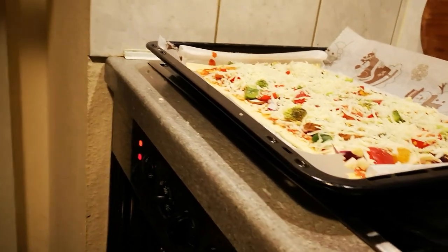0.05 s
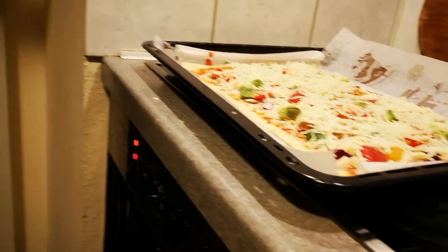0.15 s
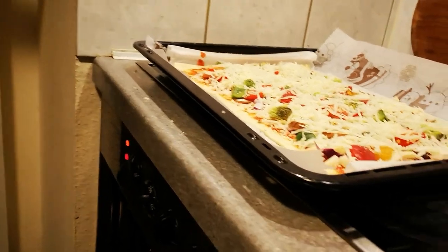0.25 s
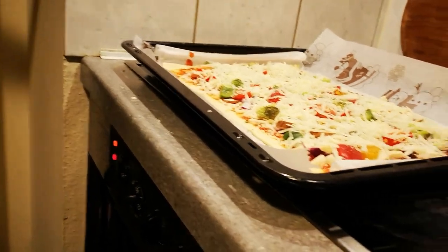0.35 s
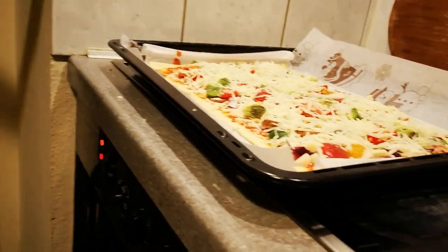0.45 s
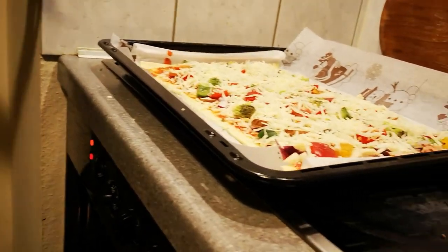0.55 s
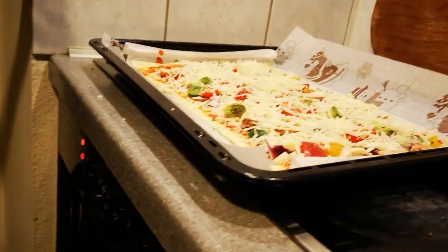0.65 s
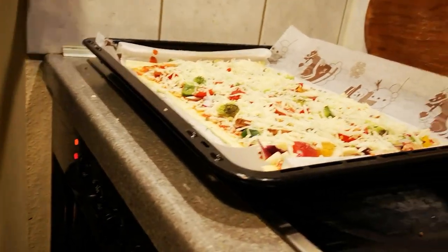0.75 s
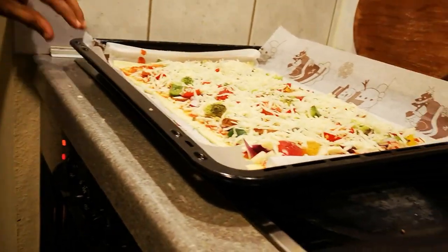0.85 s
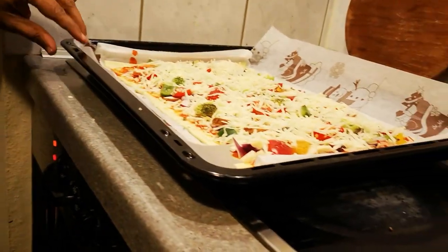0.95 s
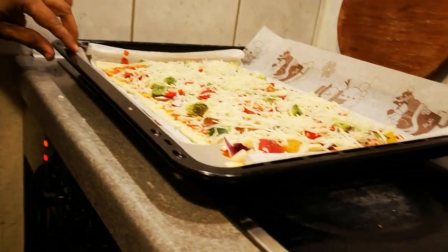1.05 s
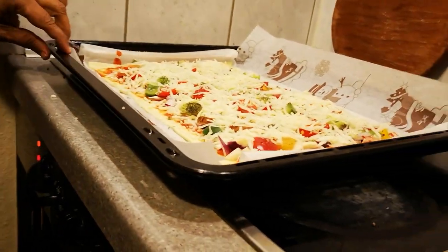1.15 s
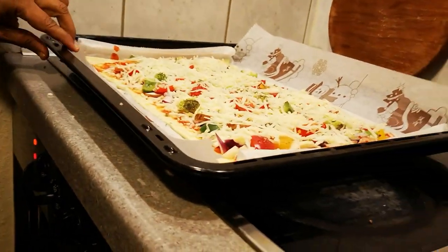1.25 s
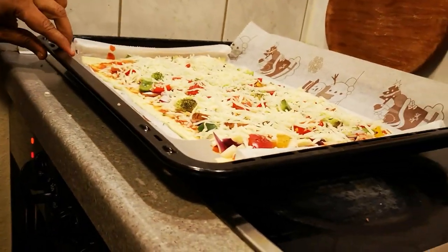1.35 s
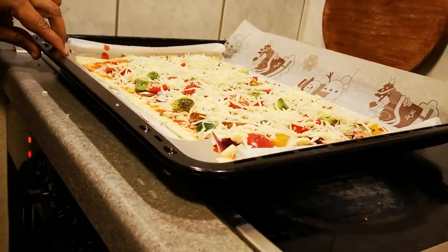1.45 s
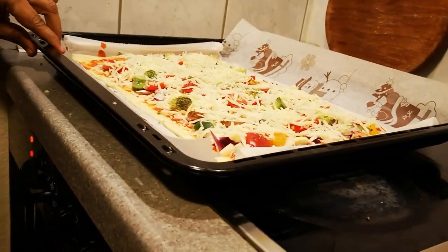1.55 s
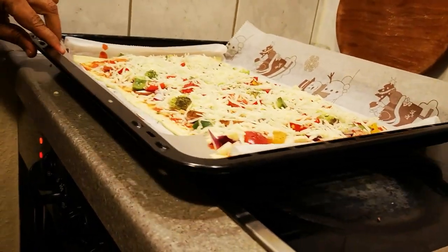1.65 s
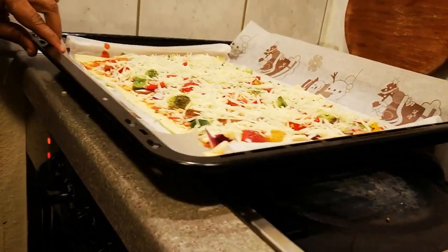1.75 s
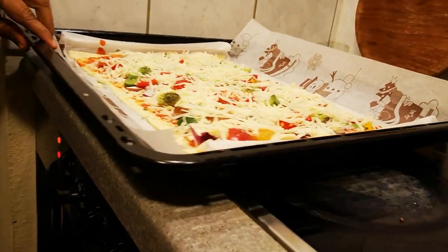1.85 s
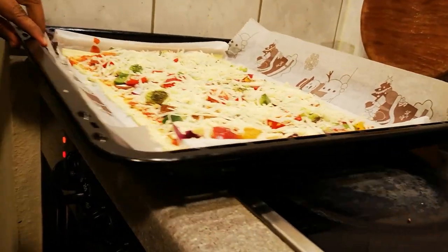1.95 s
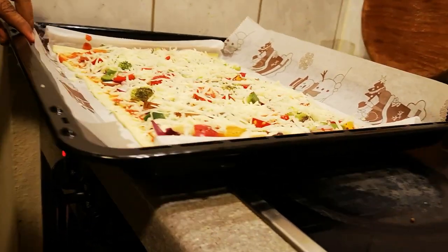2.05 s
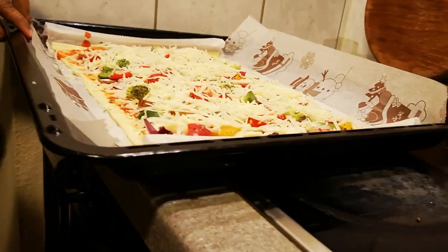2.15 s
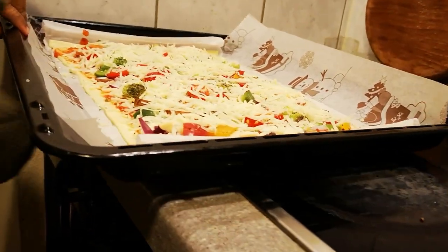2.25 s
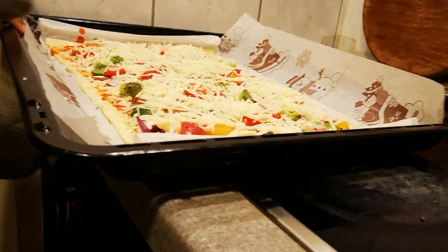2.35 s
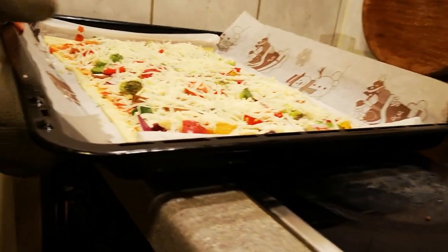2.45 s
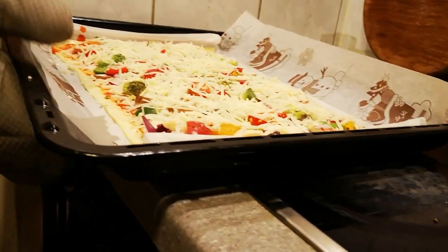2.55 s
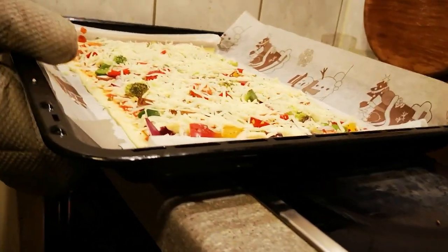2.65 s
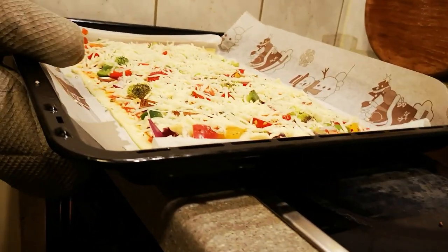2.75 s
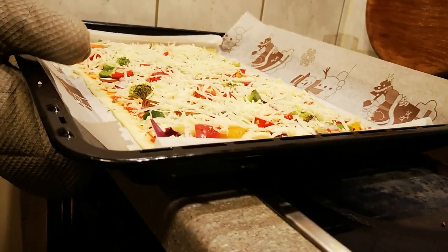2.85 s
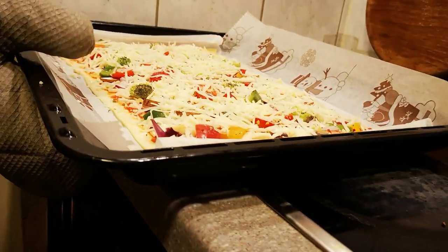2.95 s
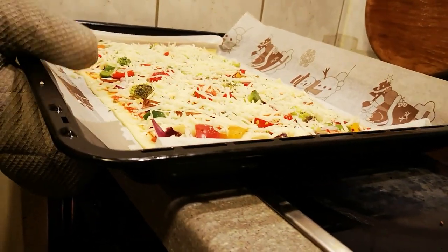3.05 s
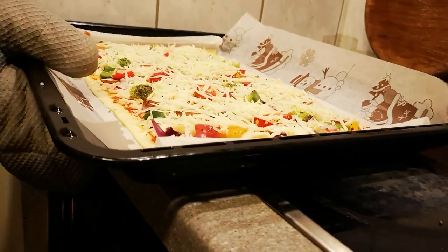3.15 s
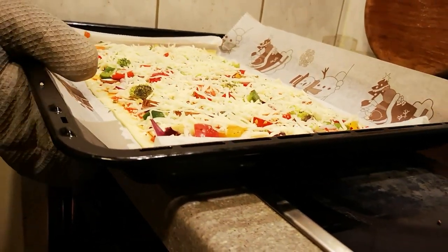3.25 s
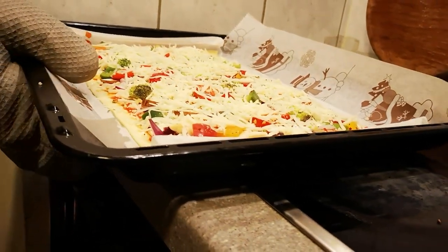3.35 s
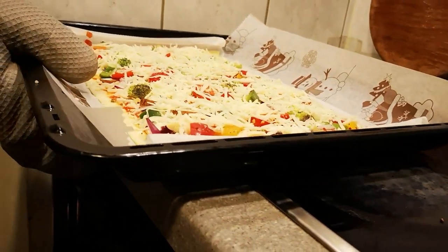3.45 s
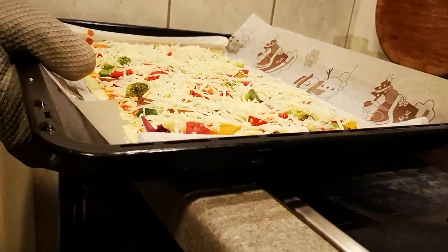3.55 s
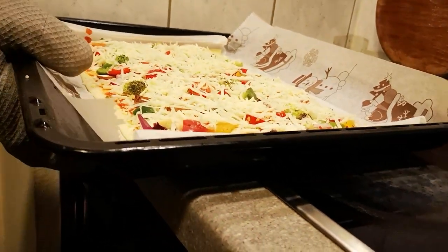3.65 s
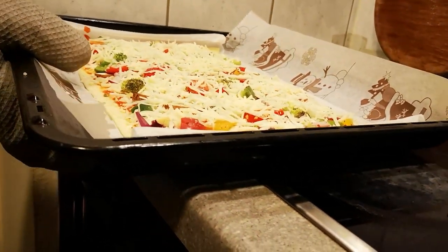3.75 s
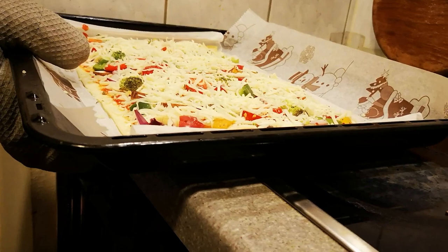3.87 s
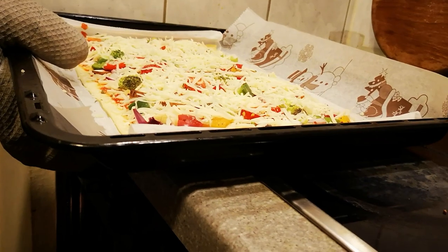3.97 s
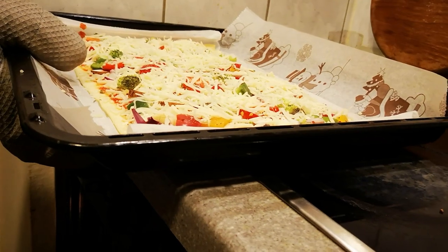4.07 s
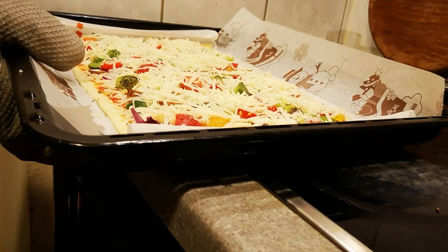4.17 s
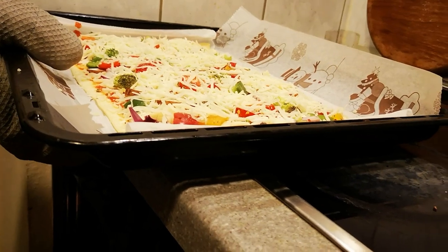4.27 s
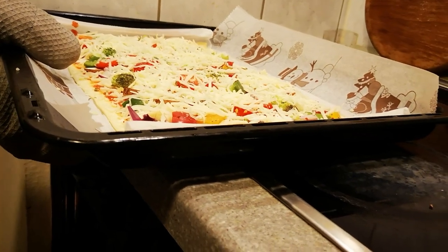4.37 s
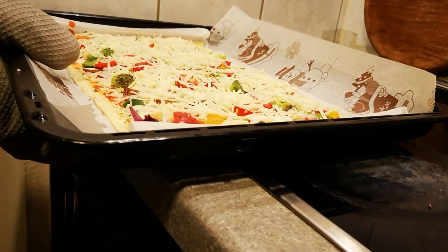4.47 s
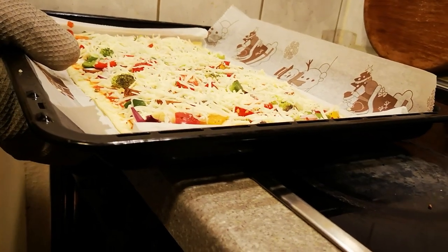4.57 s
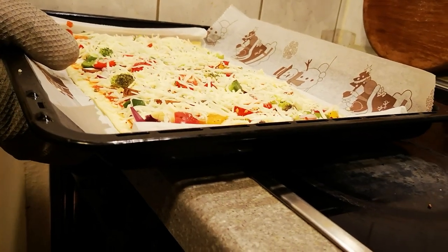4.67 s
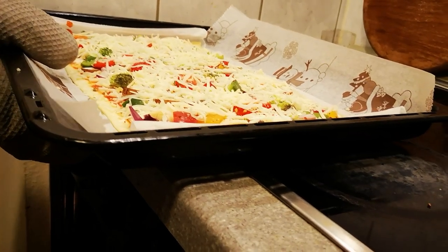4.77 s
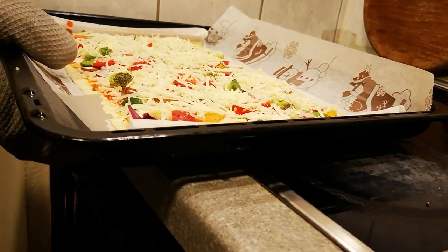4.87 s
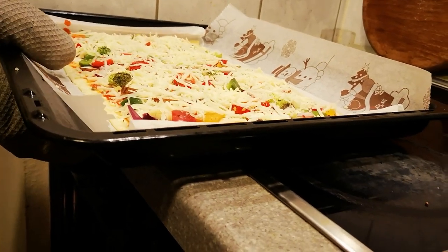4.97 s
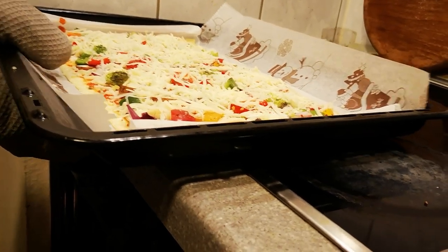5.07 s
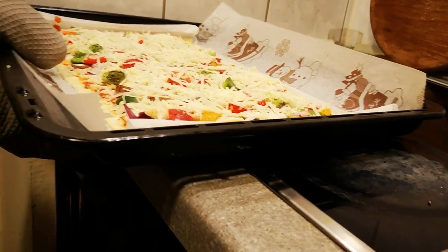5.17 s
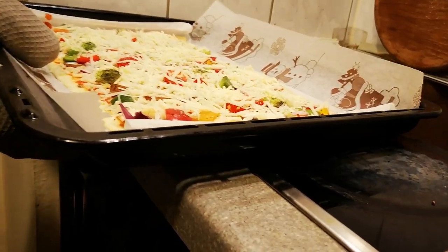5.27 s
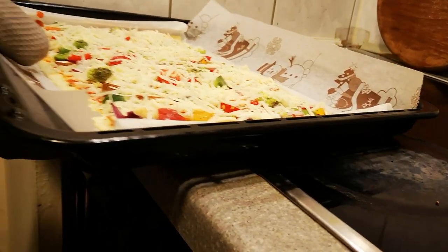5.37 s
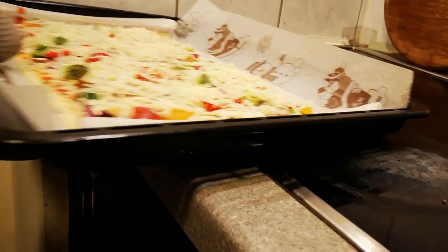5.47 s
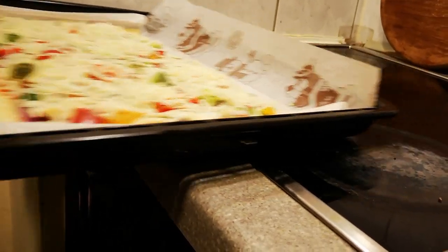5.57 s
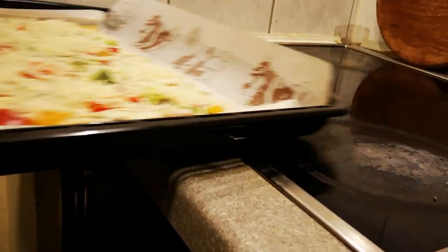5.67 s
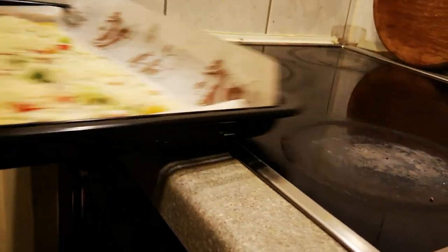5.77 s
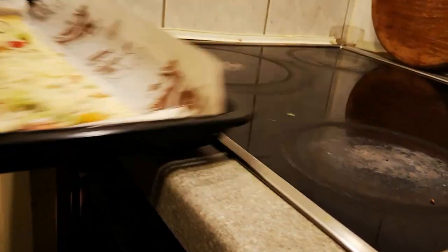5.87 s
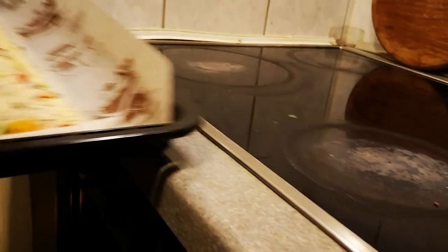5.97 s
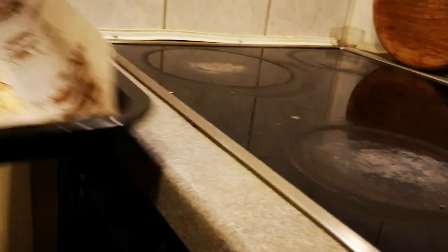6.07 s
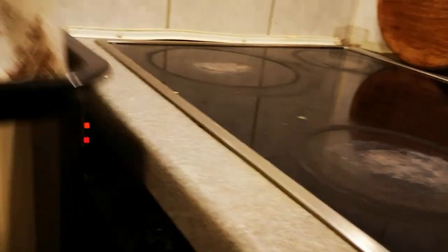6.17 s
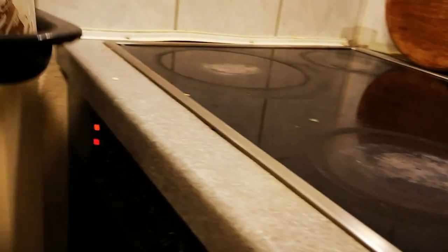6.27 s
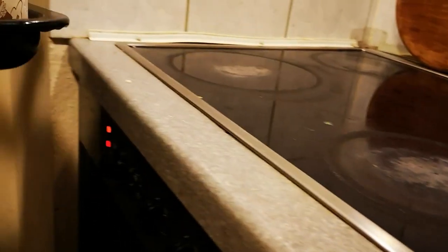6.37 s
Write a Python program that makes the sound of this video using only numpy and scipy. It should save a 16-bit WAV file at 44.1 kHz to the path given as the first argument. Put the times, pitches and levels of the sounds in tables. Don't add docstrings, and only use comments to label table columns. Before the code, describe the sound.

A quiet small kitchen with low room rumble, faint fan hum and soft airy hiss, heard closely in stereo. In the first 0.5 s a soft sleeve swipe and cloth rustle, then near quiet with a tiny fingertip tick at 1.1. At 1.37 a thin, bright metallic nudge with papery crackle; a low boom at 1.5. At 1.75 a dull tray knock rings deeply, followed by hollow steel scraping and flexing booms until about 2.2, with another knock at 2.0. Short dull thumps and scrapes come at 2.8 and 3.2, then glove rustle and light ticks around 3.5-3.7. It is nearly still from 4 to 5. Light contacts and a small rim squeak at 5.2-5.4, rattling knocks from 5.65, a rising scrape, then the loudest sharp clank at 5.9, rustling, a smaller clank at 6.07 and a quick fade to quiet.

```python
import sys
import numpy as np
from scipy import signal
from scipy.fft import rfft, irfft, next_fast_len
from scipy.io import wavfile
from scipy.ndimage import uniform_filter1d, map_coordinates

SR = 44100
rng = np.random.default_rng(int(sys.argv[2]) if len(sys.argv) > 2 else 0)


def makeup_ratio(level_db):
    decades = np.asarray(level_db, float) / 20
    return 10 ** decades


def generate_wav(sig):
    pcm = np.round(np.clip(np.atleast_2d(sig).T, -1, 1) * 32767).astype(np.int16)
    wavfile.write(sys.argv[1], SR, pcm)


N = 283122
TIME = np.arange(N) / SR

# pitch in Hz, level in dB per Hz.
ROOM_COLOUR = [(12, -43.5), (30, -7.5), (54, 1.5), (70, -8.5), (103, -5), (172, -22), (203, -19),
               (365, -28.5), (600, -30.5), (780, -59), (1320, -120)]
# pitch in Hz, level in dB per Hz.
AIR_COLOUR = [(350, -38.5), (600, -19.5), (707, -7), (778, -12.5), (892, -10.5), (968, -9), (1540, -6.5),
              (1810, -3.5), (1970, -4.5), (2850, -6.5), (3490, -10.5), (4980, -12.5), (6920, -15),
              (7820, -15.5), (15700, -20)]
# pitch in Hz, level in dB.
FAN_HUM = [(48.4, -68.5), (96.9, -74), (689.1, -93.5)]
# time in seconds, level in dB.
SWAYS = [
    (.3, -52),
    (1.86, -53),
    (2.84, -58.5),
    (3.28, -44.5),
    (5.28, -51),
    (5.85, -50.5),
]

# time in seconds, centre in Hz, level in dB.
GLIDES = [
    [(.07, 2710, -80), (.13, 2537, -69), (.2, 2190, -70), (.25, 1587, -64), (.31, 1720, -92)],
    [(1.109, 3720, -65), (1.13, 4120, -70.5), (1.22, 3930, -86)],
    [(5.31, 680, -80), (5.33, 705, -70), (5.38, 777, -59.5), (5.43, 801, -64), (5.5, 808, -73)],
    [(.02, 488, -101), (1.2, 489, -101), (1.5, 488, -112)],
]
GLIDE_WIDTHS = [800, 3200, 110, 20]

# start in seconds, level in dB, rise in seconds, fall in seconds, brightness in dB per octave.
RUSTLES = [(0, -69.5, .01, 0.093, -15.5), (.16, -72.5, 0.14, 0.14, -14), (0.345, -58.5, 0.036, 0.1, 3.5),
           (1.374, -44, 0.0018, 0.06, -2), (1.431, -51.5, 0.064, 0.09, -6), (1.758, -60, 0.021, 0.11, -6.5),
           (1.952, -59.5, 0.14, 0.44, -12), (2.182, -77, 0.042, 0.12, -11), (2.776, -68, 0.063, 0.067, -7),
           (2.822, -76.5, 0.017, 0.38, -3), (3.474, -63.5, 0.016, 0.21, -4.5), (3.55, -67.5, .06, .1, 1),
           (3.585, -60, 0.027, 0.08, -6), (3.67, -67.5, 0.003, 0.13, -7), (3.916, -71, 0.041, 0.083, -9.5),
           (4.92, -73, 0.2, 0.11, -8), (5.088, -70.5, 0.004, 0.13, -8), (5.227, -70, 0.0029, 0.14, -6),
           (5.354, -72.5, 0.016, 0.37, -10.5), (5.646, -61.5, 0.013, 0.41, -14),
           (5.832, -53.5, 0.36, 0.11, -8), (5.903, -51, 0.0024, 0.04, -11.5),
           (5.93, -49.5, 0.012, 0.25, -13.5), (6.07, -48.5, 0.0051, 0.057, -5),
           (6.12, -56, 0.14, 0.045, -11.5), (2.62, -78.5, 0.12, 0.15, -8)]
# pitch in Hz, level in dB per Hz.
CLOTH_COLOUR = [(2060, -31), (3500, -12), (5690, -2), (6290, -4), (7410, 2.5), (8360, -3.5), (9130, 2),
                (14000, -5.5), (15400, -14), (15800, -30)]

# start in seconds, peak in dB, centre in
# Hz, time to fall 60 dB in seconds.
PINGS = [(1.7546, -25, 1170, .03), (1.771, -28.5, 1830, 0.043), (1.786, -40, 1090, .04),
         (1.797, -38, 1010, 0.036), (1.857, -43, 1140, 0.058), (1.981, -50, 2020, .03),
         (2.7697, -66, 4400, .04), (2.82, -43, 860, 0.026), (2.82, -43, 1830, 0.054),
         (2.8535, -47, 2600, 0.028), (2.858, -56, 1040, .04), (2.866, -52, 1950, 0.032),
         (3.178, -49, 880, 0.055), (3.178, -47, 1890, .06), (3.2775, -60, 5800, .015),
         (3.2775, -54, 3300, 0.023), (3.215, -63, 3280, 0.027), (3.247, -60, 3500, 0.025),
         (3.278, -55, 4460, 0.019), (3.278, -54, 7100, 0.013), (3.3, -61, 2500, .02),
         (3.383, -64, 7600, 0.021), (4.868, -72, 5770, 0.089), (4.92, -69, 4340, 0.082),
         (5.085, -67, 7280, 0.13), (5.108, -63, 2502, 0.14), (5.228, -62, 7840, 0.17),
         (5.227, -56, 2900, .04), (5.385, -58, 6507, .02), (5.518, -59, 1800, .03),
         (5.547, -55, 2500, .03), (5.614, -55, 2160, .02), (5.64, -40, 2510, 0.034),
         (5.654, -50, 5550, .05), (5.7, -51.5, 2220, .03), (5.745, -44.5, 10000, .02),
         (5.796, -33, 2580, 0.038), (5.82, -41, 2170, .03), (5.8946, -21, 2010, .015),
         (5.895, -27.5, 330, 0.043), (5.894, -24.5, 6270, 0.036), (5.899, -10.5, 1420, 0.022),
         (5.9015, -19, 2200, .015), (5.897, -20.5, 2980, 0.0099), (6.0696, -31, 1274, 0.035),
         (6.0692, -22.5, 3320, 0.031), (6.074, -34, 2020, 0.041), (6.23, -75.5, 10430, 0.05),
         (1.1095, -61, 3220, 0.039), (1.7518, -25, 2400, 0.03), (1.752, -40, 617, 0.036),
               (1.756, -30, 1900, .02), (1.7525, -41, 4200, 0.015), (2.008, -42, 2100, 0.027),
               (5.897, -24.5, 1100, 0.073), (1.3712, -41, 11800, 0.093), (1.414, -42, 5200, .05),
               (1.378, -34.5, 9200, 0.072), (1.41, -41, 9100, 0.07), (1.45, -46, 9000, 0.062),
               (1.428, -58, 3600, 0.07), (3.494, -58, 9200, .05), (3.6, -49, 8500, 0.055),
               (3.6722, -60, 1900, .08), (5.2275, -63, 5600, 0.018), (5.809, -35.5, 1340, .04),
               (6.1, -44.5, 6400, .1), (6.071, -41, 4100, .12), (5.9, -46, 9500, 0.057),
               (6.095, -48.5, 6600, .15), (6.076, -43.5, 5400, .06), (5.896, -27.5, 3380, .03),
               (.995, -68, 2600, .02), (3.179, -46, 1700, 0.033), (5.653, -44, 1500, .03),
               (5.387, -54, 1800, .03), (5.826, -42, 3300, .02), (2.009, -50, 2900, .015)]

# start in seconds, peak in dB, dull part in dB, bright part in dB,
# time to fall 60 dB in seconds.
KNOCKS = [(1.2578, -49, -14, -21, 0.029), (1.943, -48, 7, -16, 0.15), (2.0063, -34.5, 7.5, -5, 0.039),
          (2.7462, -50, 1, -14, 0.053), (2.82, -35, 5, -12, 0.032), (2.8516, -32.5, -3, -18, 0.064),
          (3.178, -43.5, 14, -51, 0.008), (3.2145, -36.5, -4, -37, 0.034), (3.2794, -46, -1, -10, 0.27),
          (3.3648, -54, -8, -5, 0.18), (3.5822, -41.5, -27, -3, 0.18), (3.6718, -46.5, -6, -8, 0.22),
          (5.085, -66.5, -22.5, -35, 0.48), (5.2267, -53, -12, -18, 0.58), (5.347, -43, -4, -18.5, 0.036),
          (5.382, -40.5, -3.5, -9, 0.3), (5.5121, -61, -9, -20.5, 0.058), (5.6526, -30, -9, -15, 0.45),
          (5.7456, -42, -12, 4, 0.065), (5.8087, -24.5, -20, -19, 0.26), (6.0237, -42, 0.5, -21.5, 0.1)]
# pitch in Hz, level in dB, time to fall 60 dB in seconds.
KNOCK_RING = [(830, -20, 0.069), (1020, -2.5, 0.052), (1860, -4, 0.13), (1950, -4.5, 0.074)]
# start in seconds, peak in dB, dull part in dB, bright part in dB,
# time to fall 60 dB in seconds.
BLOWS = [
    (1.3712, -42, -37, 15, 0.052),
    (1.7513, -30, 7, -20, 0.18),
    (5.894, -10.5, -5.5, -14, 0.082),
    (6.0692, -28, -5.5, -8, 0.11),
]
# pitch in Hz, level in dB, time to fall 60 dB in seconds.
BLOW_RINGS = [
    [(1600, -5, .1), (3709, -14, .2), (4608, -6, .16), (4926, -3, .18), (5582, -6, .2), (6300, -8, .2),
     (7612, -6, .2), (9195, 0, .15), (9458, 3, .06), (11920, -4, .09)],
    [(205, 0, .12), (242, 3, .42), (343, -6, .5), (651, -15, .4), (840, -12, .3), (942, -10, .3),
     (1077, -5, .26), (1130, 5, .1), (1793, 3, .18), (2320, 2, .09), (2643, -8, .15), (2961, -12, .15),
     (3295, -16, .2), (3806, -18, .2)],
    [(374, -12, .1), (1034, -1, .3), (1330, 2, .04), (1463, -7, .35), (1646, -3, .2), (1977, -3, .3),
     (2033, -9, .3), (2285, -7, .25), (2427, -12, .25), (2900, -6, .08), (4269, -17, .15), (4915, -14, .16),
     (5760, -11, .16), (7117, -16, .22)],
    [(1300, 3, .06), (2030, 4, .3), (2592, -12, .2), (2988, -11, .16), (3235, -5, .15), (4000, -8, .22),
     (4239, -7, .22), (4414, -7, .26), (5195, -9, .12), (5572, -11, .27), (5803, -11, .15), (6277, -9, .25),
     (6800, -9, .2), (8979, -18, .2)],
]
RING_LEVELS = [0.5, -6.5, -9.5, -7]
# pitch in Hz, level in dB.
DULL_COLOUR = [(300, -40.5), (580, -12), (800, -7.5), (1200, 7.5), (2000, -43.5)]
SHARP_COLOUR = [(900, -26.5), (1500, -6), (3200, -9), (5000, -25), (8000, -40.5)]
BRIGHT_COLOUR = [(3000, -29.5), (4800, 4), (9000, -6), (12500, -17), (15500, -43.5)]

# start in seconds, level in dB, hold in seconds, fall in seconds, pitch in Hz.
BOOMS = [(1.503, -37.5, 0.026, 0.073, 67.6), (1.56, -45.5, 0.16, 0.028, 66),
         (1.728, -42.5, 0.024, .02, 65.9), (1.77, -36, 0.032, 0.069, 66), (1.861, -34, 0.055, 0.033, 69.6),
         (1.935, -31.5, 0.032, 0.028, 69.5), (1.986, -35.5, .02, 0.013, 68.4), (2.04, -55, .17, 0.13, 69.8),
         (2.773, -52, 0.016, .017, 64), (2.83, -38.5, 0.017, .03, 65), (2.866, -35.5, 0.016, 0.053, 66.4),
         (2.915, -43, 0.051, .02, 66.2), (3.194, -37.5, 0.001, 0.072, 74.5), (3.258, -47.5, 0.015, .03, 70),
         (3.312, -40.5, 0.015, 0.058, 72.4), (3.415, -51, 0, .04, 68), (5.231, -34, 0.039, .03, 72.5),
         (5.312, -48, 0.00074, .12, 68.7), (5.821, -31.5, 0.028, .015, 75.15), (5.872, -37, .01, .03, 72),
         (5.915, -38.5, 0, 0.065, 70), (5.992, -47, 0.029, 0.087, 61)]
# start in seconds, level in dB, rise in seconds, fall in seconds.
SHAKES = [(1.265, -65.5, 0.013, 0.64), (1.755, -35, 0.0063, 0.23), (1.98, -55.5, 0.16, 0.084),
          (2.05, -62.5, 0.077, 0.34), (2.755, -66, 0.0062, 0.089), (2.869, -49, 0.07, 0.09),
          (3.183, -52.5, 0.011, 0.27), (3.31, -63.5, 0.16, 0.045), (3.66, -68, 0.17, 0.38),
          (5.236, -66, 0.12, 0.44), (5.6, -66.5, 0.4, 0.57), (5.83, -47.5, 0.113, 0.23),
          (5.895, -22, 0.001, 0.0074), (5.909, -31.5, 0.0056, 0.098), (6.08, -53.5, 0.15, 0.13)]
# pitch in Hz, width in Hz, level in dB.
PLATE_MODES = [(124.6, 48.4, 1), (207.4, 32, 0.5), (249, 28, -4.5), (315, 130, -12.5), (385, 18, -12.5),
               (510, 220, -22)]
# start in seconds, level in dB, rise in seconds, fall in seconds, hollow rim tone in dB.
DRAGS = [(0.259, -65, 0.24, 0.17, -10.5), (1.27, -70, 0.046, 0.24, -7), (2.74, -74.5, 0.41, 0.25, -10.5),
         (1.385, -55.5, 0.018, 0.096, -30), (1.73, -62.5, 0.11, 0.045, -14.5),
         (1.755, -38, 0.0015, 0.092, -3.5), (1.83, -56.5, 0.084, 0.13, -3), (1.9, -59.5, 0.16, 0.11, -3),
         (2.01, -44, 0.1, 0.067, -17.5), (2.1, -56, 0.099, 0.19, -8), (2.22, -65, 0.16, 0.16, -14),
         (2.825, -53, 0.0058, 0.12, -1.5), (2.88, -68, 0.11, 0.091, -19), (3.185, -58.5, 0.002, 0.19, 2.5),
         (3.3, -64, 0.17, 0.069, -7), (3.5, -71.5, 0.36, 0.69, -21), (3.684, -66, 0.27, 0.11, -8),
         (5.25, -77, 0.57, 0.2, -14), (5.35, -63, 0.012, 0.38, -8), (5.773, -47.5, 0.44, 0.029, -12),
         (5.81, -37, 0.039, 0.16, -29), (5.871, -49, 0.082, 0.0075, -24), (5.914, -36, 0.0067, 0.21, -13.5),
         (6.079, -53, 0.0092, 0.1, -23), (6.129, -48.5, 0.084, 0.022, -18)]
# pitch in Hz, level in dB per Hz.
STEEL_COLOUR = [(410, -45), (700, -13), (858, -25), (1190, -7.5), (1680, 0), (1810, -2.5), (2440, -2),
                (4210, -21), (9000, -28), (11700, -56), (19800, -120)]
# pitch in Hz, width in Hz, level in dB.
SHEET_MODES = [(770, 53, 2.5), (1030, 160, 3.5), (1320, 17, -14.5), (1397, 51, -7.5), (1664, 15, -6.5),
               (1850, 89, -11), (2026, 32, -4.5), (2200, 12, -13.5), (2890, 32, -6)]
# pitch in Hz, width in Hz, level in dB.
RIM_MODES = [(680, 110, 4), (788, 243, 11.5)]

# pitch in Hz, level in dB.
SIDE_COLOUR = [(60, -24), (130, -13), (290, 0), (640, 5), (1410, -3), (3100, 1.5), (6820, -4), (15000, -9)]
# pitch in Hz, level in dB.
LEFT_TILT = [(60, 0.5), (240, 2.5), (950, 0), (3770, -1), (15000, -3)]
# time in seconds, left over right in dB.
TRAY_PLACE = [(0, 0), (1.3, 0.5), (1.7, 0), (2, -1), (2.3, -0.5), (3.1, 0), (3.5, -3), (3.8, -0.5),
              (5.1, -0.5), (5.3, -2), (5.75, -1), (5.9, 0.5), (6.4, -1)]


def unit(x):
    return x / np.sqrt(np.mean(x ** 2) + 1e-20)


def along(points, hz):
    f, v = np.transpose(points)
    return np.interp(np.log(hz + 1), np.log(f + 1), v)


def wobble(rate, span=slice(None)):
    knots = rng.standard_normal(int(N * rate / SR) + 4)
    return map_coordinates(knots, [TIME[span] * rate])


def coloured(x, gain):
    size = next_fast_len(x.shape[-1] + 8192)
    cepstrum = irfft(np.log(gain(np.fft.rfftfreq(size, 1 / SR)) + 1e-6), size)
    cepstrum[1:size // 2] *= 2
    cepstrum[size // 2 + 1:] = 0
    return irfft(rfft(x, size) * np.exp(rfft(cepstrum)), size)[..., :x.shape[-1]]


def coloured_noise(shape, points):
    return unit(coloured(rng.standard_normal(shape), lambda f: makeup_ratio(along(points, f))))


def resonant(peaks):
    return lambda f: np.sqrt(sum(makeup_ratio(2 * db) / (1 + (2 * (f - c) / w) ** 2) ** 2 for c, w, db in peaks))


def patchy(x, depth_db):
    z = signal.stft(x, nperseg=512)[2]
    field = uniform_filter1d(rng.standard_normal(z.shape[1:]), size=2, axis=0)
    field = uniform_filter1d(field, size=7, axis=1)
    return unit(signal.istft(z * makeup_ratio(depth_db * unit(field)), nperseg=512)[1][:, :N])


def stroke(s, db, rise_s, fall_s, hold_s=0):
    rise_s, fall_s = max(rise_s, .002), max(fall_s, .005)
    end = s + max(hold_s, 1e-4)
    edge = [s - 2 * rise_s, s - rise_s, s, end, end + fall_s, end + 2 * fall_s]
    span = slice(*np.searchsorted(TIME, [edge[0], edge[-1]]))
    gain = np.zeros(N)
    gain[span] = makeup_ratio(db + np.interp(TIME[span], edge, [-60, -20, 0, 0, -20, -60]))
    return gain


def grit(rate, spread_db, smooth):
    size = np.minimum(rng.exponential(size=N), 2.5)
    slips = (rng.random(N) < rate / SR) * makeup_ratio(spread_db * size)
    grip = signal.lfilter([1], [1, -.98], slips)
    return (unit(grip) + smooth) * rng.standard_normal((2, N))


def kitchen_air():
    out = np.zeros((2, N))
    for colour, level_db in [(ROOM_COLOUR, -68), (AIR_COLOUR, -76)]:
        out += makeup_ratio(level_db + 0.6 * wobble(2.2)) * coloured_noise((2, N), colour)
    return out


def fan_motor():
    out = np.zeros(N)
    for hz, db in FAN_HUM:
        level = makeup_ratio(db + 2.5 + 0.49 * wobble(3.4))
        out += level * np.sin(2 * np.pi * hz * TIME + .5 * wobble(2.5))
    return out


def microphone_sway():
    level = sum(stroke(s, db, rise_s=.25, fall_s=.25) for s, db in SWAYS)
    rumble = coloured(rng.standard_normal(N), lambda f: resonant([(19, 20, 0)])(f) ** 2)
    return level * unit(rumble)


def glides():
    out = np.zeros((2, N))
    for rows, width_hz in zip(GLIDES, GLIDE_WIDTHS):
        s, hz, db = np.transpose(rows)
        span = slice(*np.searchsorted(TIME, [s[0], s[-1]]))
        turn = 2 * np.pi * np.cumsum(np.interp(TIME[span], s, hz)) / SR
        level = makeup_ratio(np.interp(TIME[span], s, db))
        for channel in out:
            steady = (wobble(width_hz, span) + 60 / width_hz) * np.sin(turn)
            channel[span] += level * (steady + wobble(width_hz, span) * np.cos(turn))
    return out


def rustle():
    force = patchy(grit(rate=500, spread_db=3, smooth=2.5), depth_db=2.5)
    out = np.zeros((2, N))
    for *shape, tilt in RUSTLES:
        gain = stroke(*shape)
        span = gain > makeup_ratio(-105)
        cloth = coloured(force[:, span],
                         lambda f: makeup_ratio(along(CLOTH_COLOUR, f) + tilt * np.log2(f / 8000 + 0.086)))
        out[:, span] += gain[span] * unit(cloth)
    return makeup_ratio(0.36 * wobble(74)) * out


def ticks():
    out, t = np.zeros((2, N + SR)), np.arange(SR // 8) / SR
    for s, db, hz, t60 in PINGS:
        noise = rng.standard_normal((2, 2 * len(t)))
        puff = coloured(noise, resonant([(hz, 0.17 * hz, 0)]))[:, len(t):]
        ping = np.sin(2 * np.pi * (hz * t + [[0], [1 / 4]])) + 0.67 * unit(puff)
        fall = makeup_ratio(-60 * t / t60) * (1 - np.exp(-t / 0.0003))
        apart = [[1], [min(hz / 800, 1)]]
        start = round(s * SR)
        out[:, start:start + len(t)] += makeup_ratio(db - 4.5) * ping * fall * apart
    return out[:, :N]


def ringing(ring, t):
    tone = 0
    for hz, db, t60 in ring:
        cluster = hz * (1 + 0.009 * np.array([-1, 0, .7]))[:, None, None]
        drift = 5e-10 * hz ** 2 * np.cumsum(rng.standard_normal((3, 1, len(t))), axis=2)
        waves = np.sin(2 * np.pi * (cluster * t + drift + rng.random((3, 1, 1)) + [[0], [1 / 4]]))
        apart = [[1], [min(hz / 800, 1)]]
        tone = tone + makeup_ratio(db - 60 * t / t60) * apart * (waves[1] + 0.45 * (waves[0] + waves[2]))
    return tone


def contacts(events, rings, crack_db, click):
    out, t = np.zeros((2, N + SR)), np.arange(SR // 3) / SR
    gate = 1 / (1 + np.exp((t - .085) / 0.088))
    for (s, db, dull_db, bright_db, t60), ring in zip(events, rings):
        room_tail = 0.032 * makeup_ratio(-60 * t / 0.87)
        fall = click * makeup_ratio(-60 * t / 0.021) + makeup_ratio(-60 * t / t60) + room_tail
        fall = fall * (1 - np.exp(-t / 0.0011)) * gate
        burst = np.zeros((2, len(t)))
        for colour, part_db in [(DULL_COLOUR, dull_db), (SHARP_COLOUR, 0), (BRIGHT_COLOUR, bright_db)]:
            burst += makeup_ratio(part_db) * coloured_noise((2, len(t)), colour)
        tone = ringing(ring, t) * gate * (1 - np.exp(-t / 0.0012))
        start = round(s * SR)
        out[:, start:start + len(t)] += makeup_ratio(db) * (makeup_ratio(crack_db) * burst * fall + tone)
    return out[:, :N]


def small_knocks():
    ring = [(hz, db - 15.5, t60) for hz, db, t60 in KNOCK_RING]
    return contacts(KNOCKS, [ring] * len(KNOCKS), crack_db=-14.0, click=0.4)


def rim_blows():
    rings = [[(hz, db + gain_db, t60) for hz, db, t60 in ring]
             for ring, gain_db in zip(BLOW_RINGS, RING_LEVELS)]
    return contacts(BLOWS, rings, crack_db=-7.5, click=1.0) * [[1], [1.4]]


def boom():
    s, *_, hz = np.transpose(BOOMS)
    turn = 2 * np.pi * np.cumsum(np.interp(TIME, s, hz)) / SR
    push = sum(stroke(s, db, 0.012, fall_s, hold_s) for s, db, hold_s, fall_s, _ in BOOMS)
    push = push * makeup_ratio(1.5 * wobble(40))
    return np.sqrt(2) * push * (np.sin(turn) + 7 * push * np.sin(2 * turn + 1))


def plate_shake():
    force = grit(rate=44, spread_db=3, smooth=2.4)
    shake = unit(coloured(force, resonant(PLATE_MODES))[0])
    return sum(stroke(*row) for row in SHAKES) * shake * [[1], [.25]]


def drag():
    force = grit(rate=140, spread_db=2, smooth=2.3)
    sheet = unit(coloured(force, lambda f: makeup_ratio(along(STEEL_COLOUR, f)) * (.55 + 1.2 * resonant(SHEET_MODES)(f))))
    sheet = patchy(sheet, depth_db=1.8)
    rim = unit(coloured(force, resonant(RIM_MODES)))
    sheet_level, rim_level = np.zeros(N), np.zeros(N)
    for *shape, rim_db in DRAGS:
        rub = stroke(*shape)
        sheet_level += rub
        rim_level += makeup_ratio(rim_db) * rub
    return makeup_ratio(0.52 * wobble(45)) * (sheet_level * sheet + rim_level * rim)


def scene():
    field = kitchen_air() + glides() + rustle() + ticks()
    field = field + small_knocks() + rim_blows() + plate_shake() + drag()
    mid = field[0] + fan_motor() + microphone_sway() + boom()
    side = coloured(field[1], lambda f: makeup_ratio(along(SIDE_COLOUR, f)))
    left = coloured(mid + side, lambda f: makeup_ratio(along(LEFT_TILT, f) / 2))
    right = coloured(mid - side, lambda f: makeup_ratio(-along(LEFT_TILT, f) / 2))
    lean = makeup_ratio(np.interp(TIME, *np.transpose(TRAY_PLACE)) / 2)
    return np.array([left * lean, right / lean])


def band_limit(x):
    return signal.sosfilt(signal.butter(12, 16370, fs=SR, output="sos"), x)


def record(dry):
    top_hz, gate_db = 15300, -82
    soft = dry / np.sqrt(1 + (dry / 1.2) ** 2)
    whole, hz = rfft(soft), np.fft.rfftfreq(N, 1 / SR)
    treble = irfft(whole.mean(0) * (hz > 11000), N)
    quiet = uniform_filter1d(treble ** 2, size=2048) < makeup_ratio(2 * gate_db)
    calm = uniform_filter1d(1. * quiet, size=512)
    top_band = irfft(whole * (hz >= top_hz) * (hz < 15750), N)
    mix = irfft(whole * (hz < top_hz), N) + calm * top_band
    return band_limit(mix)


dry = scene()
out = record(dry)
generate_wav(out)
```